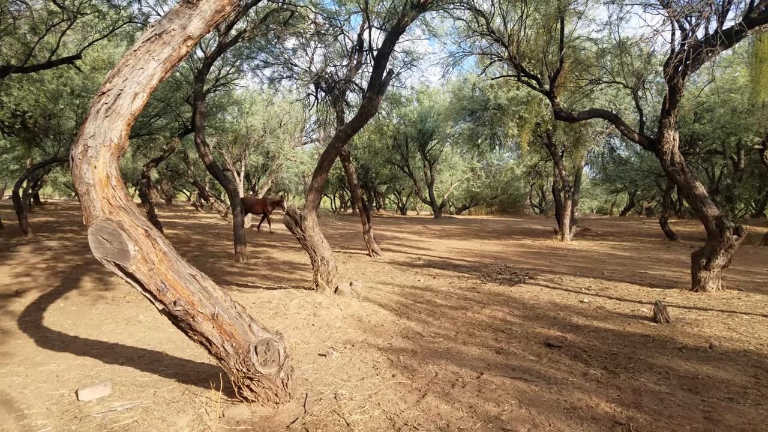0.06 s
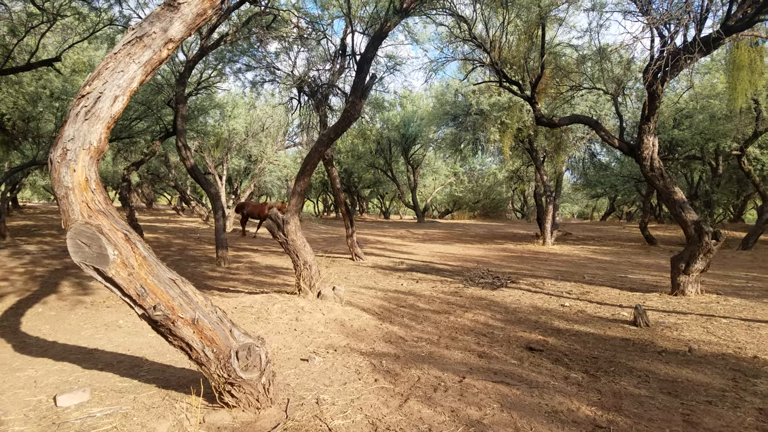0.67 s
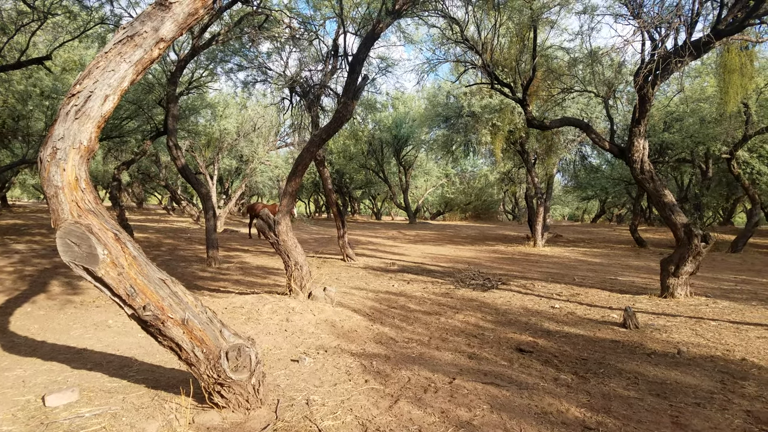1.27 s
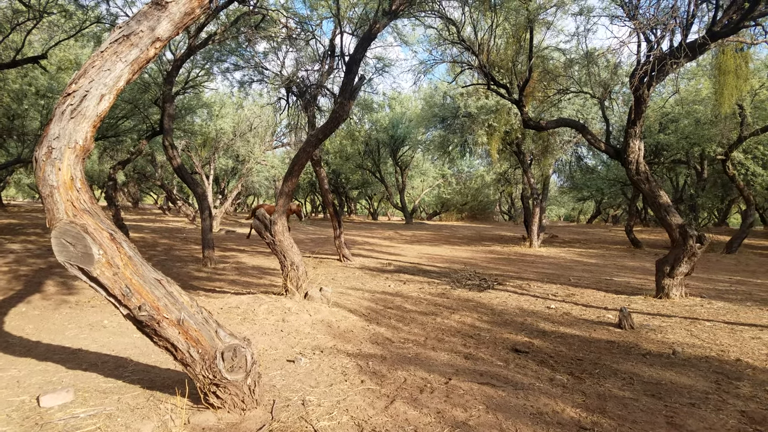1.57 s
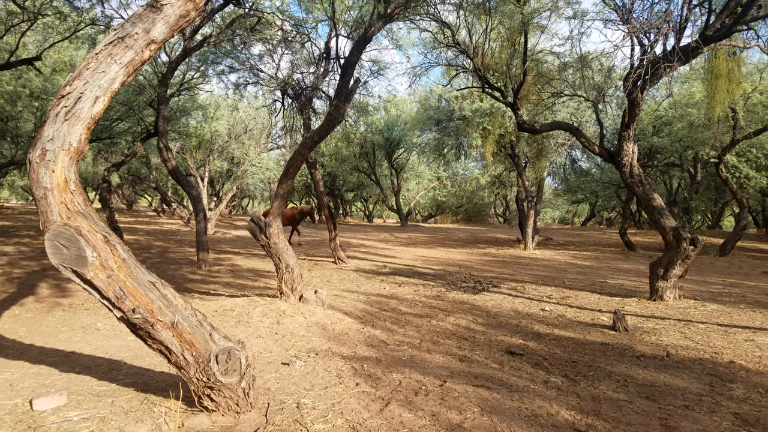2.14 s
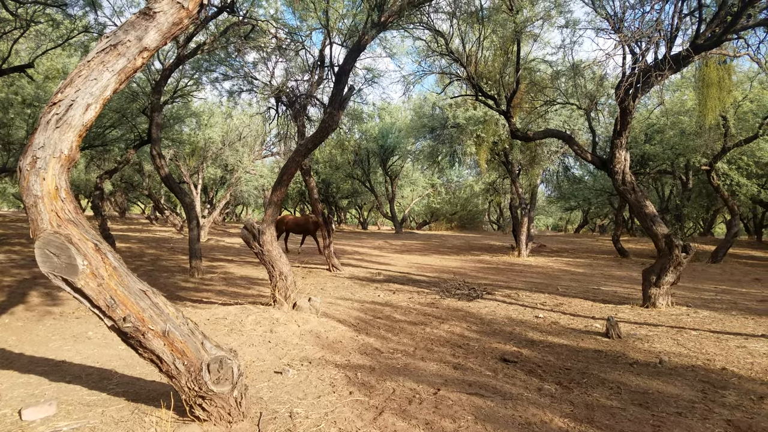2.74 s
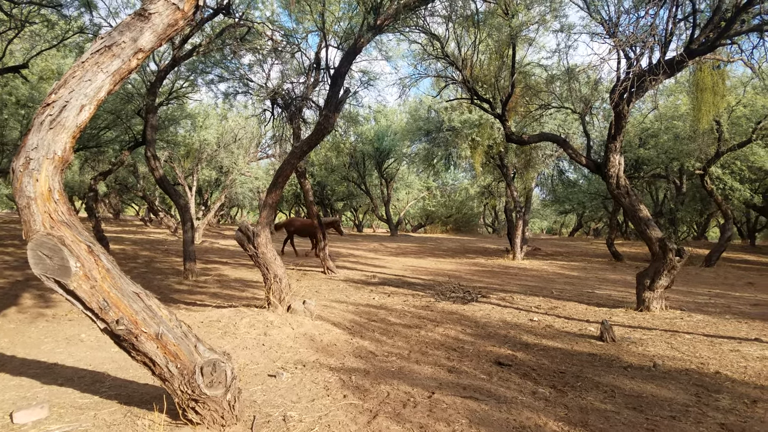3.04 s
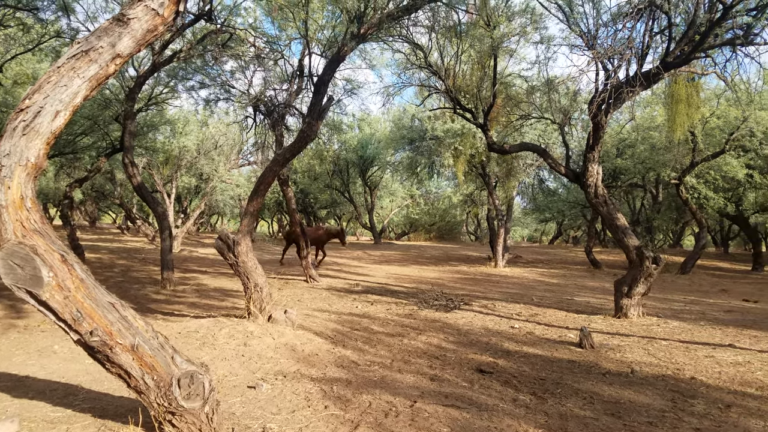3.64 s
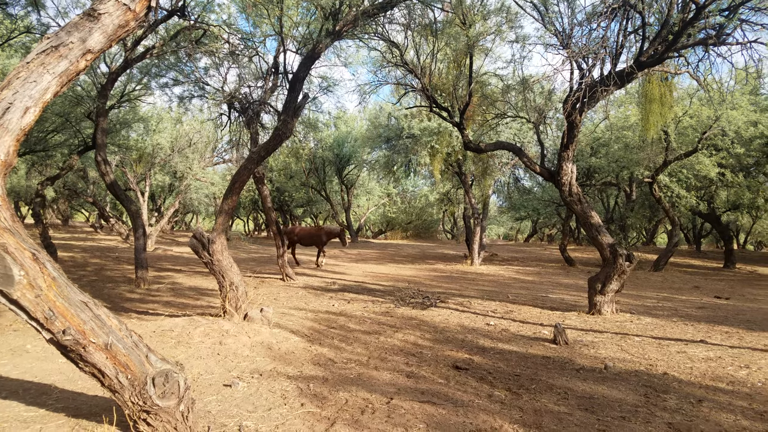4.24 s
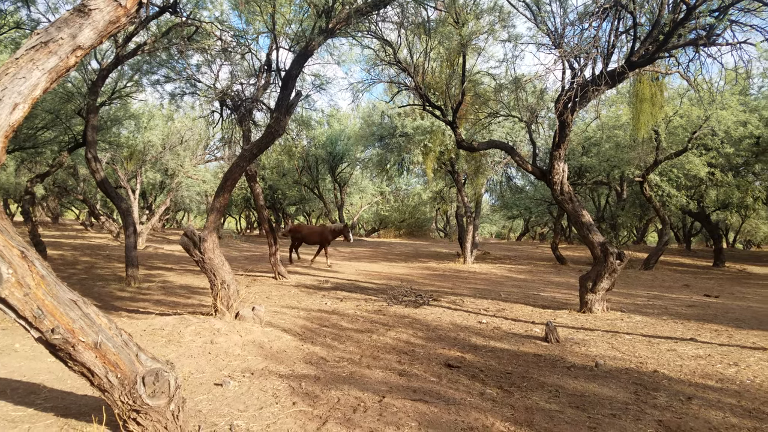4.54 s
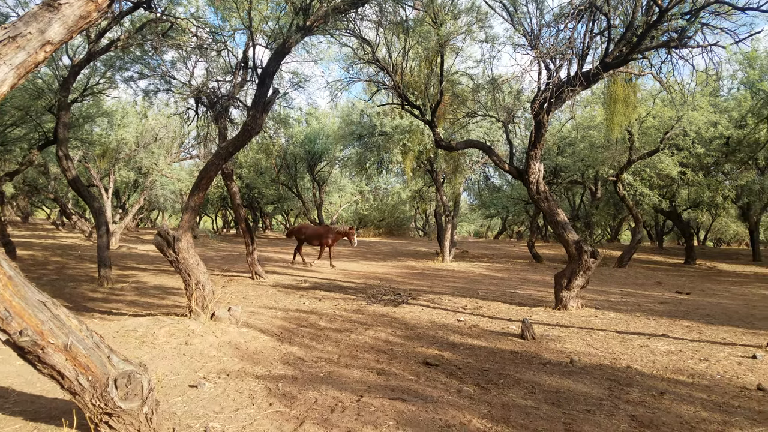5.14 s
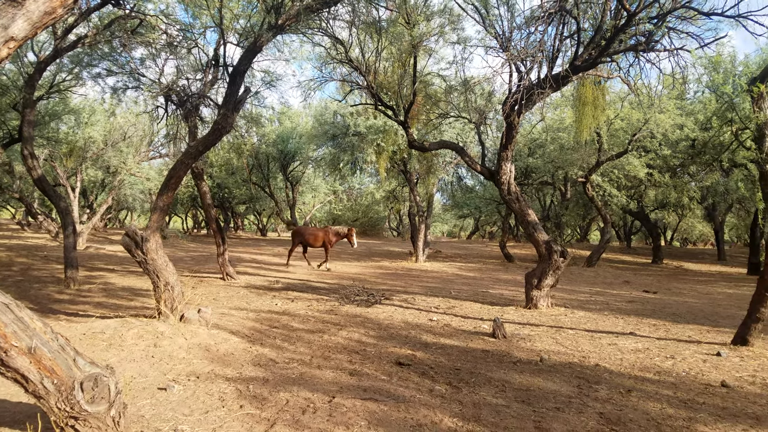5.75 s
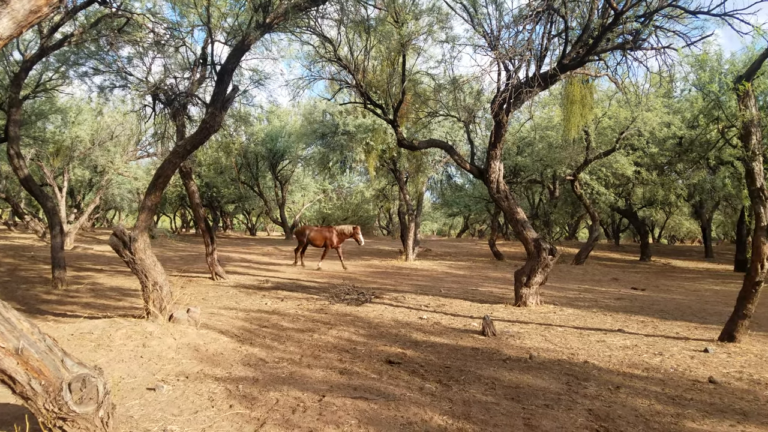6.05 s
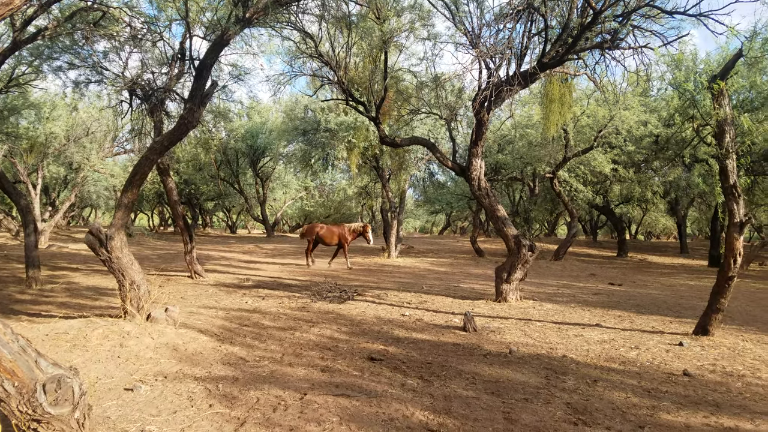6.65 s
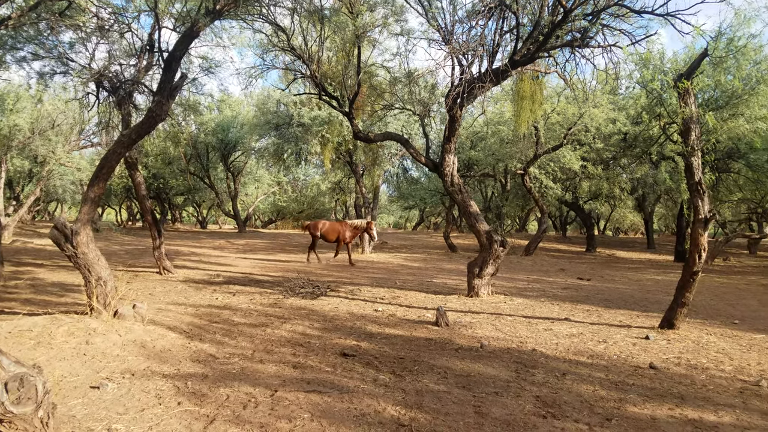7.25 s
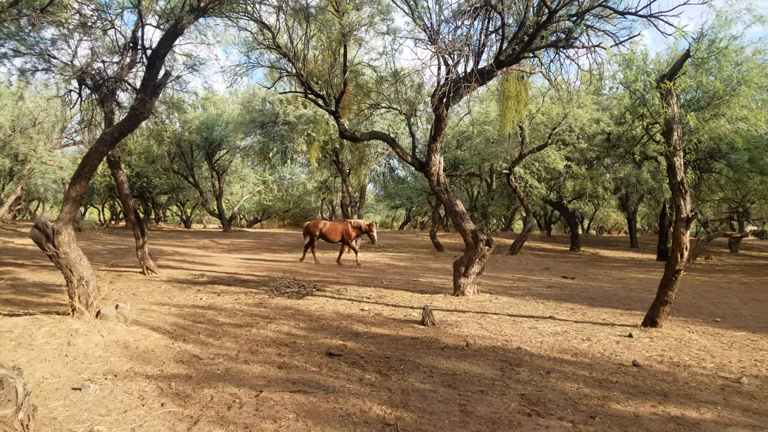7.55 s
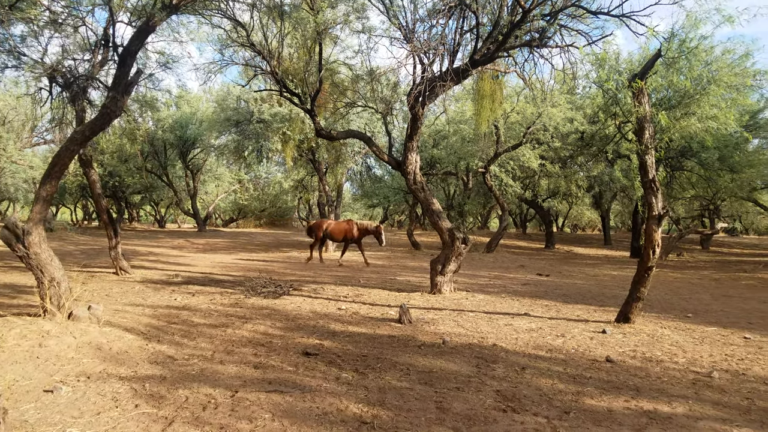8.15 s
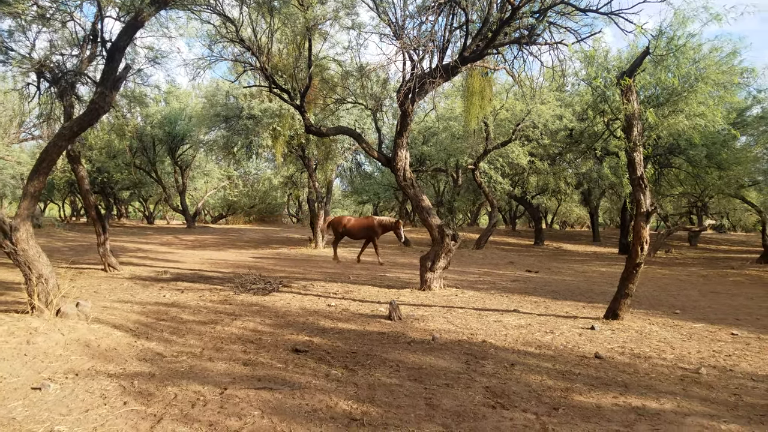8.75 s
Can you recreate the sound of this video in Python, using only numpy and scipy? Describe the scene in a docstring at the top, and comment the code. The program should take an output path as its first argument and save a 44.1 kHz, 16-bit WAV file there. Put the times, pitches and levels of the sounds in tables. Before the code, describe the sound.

A far-off engine throbs on the left and slowly grows louder, with a thin whine and the hiss of tyres on gravel. Faint dry ticks, brief bird calls and a soft breeze fill the quiet space among trees. Two close, sharp clicks halfway through are the loudest sounds. Three light metallic clinks follow, then a dry rustle and a few low bumps of wind on the microphone.

```python
"""A motor vehicle drones far off to the left of a quiet grove, gathers speed, changes gear and draws nearer.
Its exhaust throbs under a thin whine, its tyres roar and crunch on gravel, and a breeze stirs the leaves.
There are dry ticks, gritty scrapes and thin bird-like chips, and small birds call. Something catches and
lets go at the microphone with two sharp clicks, then loose metal clinks three times. Gritty rustles come
and go, loudest near the end, where a high fizz tops them and air buffets the microphone."""
import sys
import numpy as np
from scipy import signal
from scipy.fft import rfft, irfft, next_fast_len
from scipy.io import wavfile
from scipy.ndimage import uniform_filter1d, map_coordinates

SR = 44100
rng = np.random.default_rng(int(sys.argv[2]) if len(sys.argv) > 2 else 0)


def waveform_to_disk(signal):
    """Save audio, clipped to [-1, 1], as 16-bit WAV at the path in sys.argv[1]."""
    frames = np.transpose(np.atleast_2d(signal))
    scaled = np.clip(frames, -1, 1) * 32767
    samples = np.round(scaled).astype(np.int16)
    wavfile.write(sys.argv[1], SR, samples)


N = 392931
T = np.arange(N) / SR

# the engine's firing rate: t/s, f/Hz
FIRING_RATE = [(0,165),(.75,179),(1.02,168),(2.08,179.4),(2.9,199.5),(4.1,228),(4.45,233.5),(4.69,231),(4.99,192),(6,202.5),(6.83,209.8),(7.54,214),(8.91,220)]
# the vehicle grows louder as it nears: t/s, gain/dB
APPROACH_GAIN = [(0, -9.5), (1, -11), (2.2, -12.5), (2.9, -7), (4.1, -4), (4.8, -1.5), (6.4, -0.5),
                 (8.45, -0.3), (8.91, -0.5)]
# its bearing: t/s, lead of the left ear/ms
LEFT_LEAD = [(0, 0.45), (6, .43), (7.7, 0.35), (8.9, 0.3)]


def gain_of(db):
    """Decibels to amplitude."""
    return 10 ** (np.asarray(db) / 20)


def unit_rms(x):
    """Scales to rms 1."""
    return x / np.sqrt(np.mean(x ** 2) + 1e-20)


def curve(rows, column=1):
    """One column of a table, joined by straight lines in time."""
    rows = np.array(rows)
    return np.interp(T, rows[:, 0], rows[:, column])


def spectrum_at(points, hz):
    """A spectrum joined by straight lines on a log-frequency axis."""
    f, value = np.transpose(points)
    return np.interp(np.log(hz + 1), np.log(f + 1), value)


def add(mix, start, sound):
    """Mixes a sound in at a start time in seconds."""
    part = mix[:, round(start * SR):][:, :sound.shape[-1]]
    part += sound[..., :part.shape[-1]]


def noise(spectrum):
    """Coloured noise of rms 1, rolling off above the spectrum's last point."""
    count = next_fast_len(N)
    hz = np.fft.rfftfreq(count, 1 / SR)
    shape = gain_of(spectrum_at(spectrum, hz)) / (1 + (hz / (2 * spectrum[-1][0])) ** 2)
    return unit_rms(irfft(rfft(rng.standard_normal(count)) * shape, count)[:N])


def drift(rate_hz):
    """Smooth random wandering of rms 1."""
    knots, coarse = rng.standard_normal(4000), T[::16]
    wander = map_coordinates(knots, [coarse * rate_hz], order=3, mode="wrap")
    return unit_rms(np.interp(T, coarse, wander))


def ears(x, lead_ms):
    """Places a sound by delaying the right ear."""
    delayed = np.arange(len(x)) - lead_ms * SR / 1000
    return np.array([x, map_coordinates(x, [delayed], order=3, mode="nearest")])


def from_road(spectrum, scatter, right_db):
    """Noise from the vehicle's bearing; the trees scatter a share of its power into a diffuse wash."""
    diffuse = np.array([noise(spectrum), noise(spectrum)])
    direct = ears(noise(spectrum), curve(LEFT_LEAD))
    balance = gain_of([[-right_db / 2], [right_db / 2]])
    return (np.sqrt(1 - scatter) * direct + np.sqrt(scatter) * diffuse) * balance


def impulse_response(db):
    """A minimum-phase filter of this colour, with energy 1."""
    log_gain = np.log(gain_of(np.r_[db, db[-2:0:-1]]))
    response = np.fft.ifft(np.exp(np.conj(signal.hilbert(log_gain)))).real
    return response / np.linalg.norm(response)


def burst(rise, t60, size=4096):
    """A swarm of tiny slips that swells and dies away; rise and t60 in seconds."""
    t = np.arange(size) / SR
    envelope = np.minimum(t / rise, 1) * gain_of(-60 * np.maximum(t - rise, 0) / t60)
    return rng.choice([-1., 1.], size) * envelope


def flat_burst(rise, t60):
    """A burst with no colour of its own, so that the struck body alone sets the timbre."""
    slips = burst(rise, t60)
    envelope = abs(slips)
    for _ in range(12):  # whiten, then restore the envelope
        flat = irfft(np.exp(1j * np.angle(rfft(slips))))
        slips = flat * envelope / np.sqrt(abs(uniform_filter1d(flat ** 2, size=24)) + 1e-20)
    return slips


def engine():
    """Three exhaust orders and a fuzzy whine, fluttering on their way through moving air."""
    # how hard the engine pulls: t/s, load/0..1
    pull = [(2.3, 0.02), (2.9, 0.99), (4.2, 0.65), (4.8, 0), (5.8, 0.8), (6.95, 1), (7.4, 0.63),
            (8.91, 0.3)]
    # the firing tone fades in and out through the trees: t/s, level/dB
    firing_level = [(0, -70), (.65, -56), (1.05, -66.5), (2.1, -59.5), (2.9, -50), (3.33, -59.5),
                    (3.9, -48), (4.9, -59), (5.2, -52), (6, -48.5), (6.75, -44), (7.13, -53.5), (7.53, -42),
                    (7.87, -54), (8.08, -45), (8.36, -55), (8.6, -50.5), (8.91, -51)]
    # the whine spools up and down behind the engine: t/s, f/Hz
    whine_pitch = [(0, 8300), (.9, 8900), (2.4, 9100), (3.5, 11100), (4.6, 12400), (5.3, 11300),
                   (5.8, 11300), (7.5, 12150), (8.91, 12350)]
    load = curve(pull)
    top_gear = np.interp(T, (4.3, 5.26), (0, 1))
    firings = np.cumsum(curve(FIRING_RATE) * (1 + .0038 * drift(rate_hz=14))) / SR
    orders = [(1, curve(firing_level) - .5, .16),
              (.5, -71 + 12.5 * top_gear + 3 * load, .25),  # uneven firing, stronger in the higher gear
              (1.5, -73.5 + 17.5 * load, .2)]
    drone = np.zeros(N)
    for multiple, level_db, flutter_rad in orders:
        phase = 2 * np.pi * (multiple * firings + rng.random()) + flutter_rad * drift(rate_hz=28)
        drone += gain_of(level_db + 1.26 * drift(rate_hz=30)) * np.sin(phase)
    lower_hz = curve(whine_pitch)
    upper_hz = 1.28 * lower_hz
    lower = np.sin(2 * np.pi * np.cumsum(lower_hz * (1 + .0075 * drift(rate_hz=400))) / SR)
    upper = np.sin(2 * np.pi * np.cumsum(upper_hz * (1 + .015 * drift(rate_hz=440))) / SR)
    resonance_hz, width_hz = 15200, 1200
    upper /= 1 + (2 * (upper_hz - resonance_hz) / width_hz) ** 2
    whine = gain_of(-87.5) * lower + gain_of(-78) * upper
    whine *= gain_of(8 * load + .15 * curve(APPROACH_GAIN) + 2.5 * drift(rate_hz=20))
    return np.sqrt(2) * ears(drone + whine, curve(LEFT_LEAD)) * gain_of([[-.7], [.1]])


def rumble_and_roar():
    """Exhaust rumble and tyre roar grow with the approach; a deep swell joins them near the end."""
    # spectra of the three layers: f/Hz, level/dB
    rumble_colour = [(30, -44), (60, -8.5), (100, -7.5), (150, -2), (240, 0), (320, -3.5), (430, -5.5),
                     (560, -22.5), (900, -39)]
    roar_colour = [(300, -7.5), (480, -1.5), (600, 0), (850, 2.5), (1200, -1.5), (1600, -2), (2000, -12),
                   (3500, -41)]
    swell_colour = [(15, -22), (35, -16), (60, -5), (100, 7), (160, -20), (300, -3)]
    # the swell's rise: t/s, level/dB
    swell_level = [(8.1, -85), (8.32, -67), (8.39, -52), (8.6, -53.5), (8.91, -49.5)]
    approach_db = curve(APPROACH_GAIN)
    rumble = from_road(rumble_colour, scatter=.028, right_db=0)
    rumble *= gain_of(-50.5 + approach_db + .32 * drift(rate_hz=11))
    roar = from_road(roar_colour, scatter=.39, right_db=1)
    roar *= gain_of(-56 + .74 * approach_db + .53 * drift(rate_hz=15))
    swell = from_road(swell_colour, scatter=.023, right_db=-1) * gain_of(curve(swell_level))
    return rumble + roar + swell


def gravel():
    """Tyres on gravel: a hiss that grows with engine speed and brightens as it nears, and popping grit."""
    # spectra of far hiss, near hiss and grit: f/Hz, level/dB
    far_colour = [(1100, -53), (1750, 1.5), (2300, 5.5), (2950, 0.5), (3500, -5), (4500, -15.5),
                  (5500, -21), (6700, -16), (7800, -44), (8700, -11), (10500, -49), (16000, -20)]
    near_colour = [(1100, -43), (1750, -13), (2300, -2), (3000, 2), (3600, -6), (4600, 1), (5500, -4),
                   (6500, -5.5), (9000, -10), (12000, -22), (16000, -25)]
    grit_colour = [(1200, -8.5), (2000, 1.5), (3000, -0.5), (3700, -5), (7000, -41)]
    # crossfade from far to near: t/s, near share/0..1
    nearness = [(5.3, .05), (7, 0.59), (8.91, 0.6)]
    # crunches under the tyres: t/s, level/dB
    grit_level = [(0, -63), (.5, -69), (.95, -59.5), (1.75, -61.5), (2.1, -67), (4.1, -58.5), (4.75, -56.5),
                  (5.5, -66.5), (7.5, -63.5), (8.3, -78)]
    near = curve(nearness)
    far_hiss = np.sqrt(1 - near) * from_road(far_colour, scatter=.79, right_db=4.5)
    near_hiss = np.sqrt(near) * from_road(near_colour, scatter=.26, right_db=-.5) * gain_of(-2.5)
    cruise_hz, db_per_hz = 200, .09
    hiss_db = -59 + .2 * curve(APPROACH_GAIN) + db_per_hz * (curve(FIRING_RATE) - cruise_hz)
    hiss = (far_hiss + near_hiss) * gain_of(hiss_db + 1.25 * drift(rate_hz=90))
    clumps = unit_rms(gain_of(3.2 * drift(rate_hz=250) + drift(rate_hz=20)))
    grit = from_road(grit_colour, scatter=.17, right_db=3.5) * clumps * gain_of(curve(grit_level))
    return hiss + grit


def breeze():
    """Lumpy low wind and fine leaf hiss, independent in each ear."""
    # spectra of wind and leaves: f/Hz, level/dB
    wind_colour = [(30, -11), (55, 1), (85, 1), (140, -3.5), (250, -3.5), (400, -3.5), (600, -17.5),
                   (1200, -14.5), (3000, -55)]
    leaf_colour = [(1500, 3.5), (3000, -1), (5000, 5.5), (7000, -2), (10000, 0.5), (13000, 0), (16000, 3.5)]
    # the breeze's strength: t/s, wind level/dB, leaf level/dB
    levels = [(0, -58.5, -69.5), (2, -55.5, -68), (4.5, -56, -61.5), (6.5, -67, -62.5), (8.91, -81, -61)]
    wind = np.array([noise(wind_colour) * gain_of(ear_db + .26 * drift(rate_hz=8.1))
                     for ear_db in (-4, 2)])
    leaves = np.array([noise(leaf_colour), noise(leaf_colour)]) * gain_of(.5 * drift(rate_hz=28))
    return wind * gain_of(curve(levels)) + leaves * gain_of(curve(levels, column=2))


def sizzle():
    """Two narrow bands of noise from the vehicle's side, coming in small surges."""
    # envelopes of the two bands: t/s, level/dB
    low_level = [(.7, -74), (.9, -68.5), (2.1, -69.5), (2.6, -70), (5.8, -88), (6.7, -68)]
    high_level = [(2.3, -83), (3.6, -70), (7.8, -69), (8.28, -63), (8.7, -76)]
    out = np.zeros(N)
    for centre_hz, width_hz, level in [(4420, 940, low_level), (5440, 560, high_level)]:
        b, a = signal.iirpeak(centre_hz, centre_hz / width_hz, fs=SR)
        band = unit_rms(signal.lfilter(b, a, signal.lfilter(b, a, rng.standard_normal(N))))
        out += band * gain_of(curve(level) + 1.2 * drift(rate_hz=13))
    return ears(out, curve(LEFT_LEAD))


def ticks_and_chips():
    """Short dry ticks from the vehicle's side and very high, thin bird-like chips near the centre."""
    # ticks (low) and chips (high): t/s, relative level/dB, centre f/Hz
    events = [(0.026, -54.5, 2510), (0.81, -64, 10800), (1.127, -48.5, 2180), (1.369, -68, 10900),
              (1.838, -53, 2100), (2.895, -53.5, 2300), (3.02, -49, 1860), (5.055, -55.5, 11100),
              (5.221, -56.5, 11200), (5.361, -56, 10800), (5.386, -51, 10700), (8.024, -55, 1900),
              (8.187, -51, 2000), (8.643, -51, 10900), (8.83, -58, 10900)]
    out, hz = np.zeros((2, N)), np.fft.rfftfreq(512, 1 / SR)
    for start, db, centre_hz in events:
        band_db = -20 * np.log10(1 + abs((hz - centre_hz) / 750) ** 3)
        blip = signal.fftconvolve(burst(rise=.00039, t60=.011), impulse_response(band_db))
        add(out, start, gain_of(db + 7.5) * ears(blip, lead_ms=.44 if centre_hz < 5000 else .02))
    return out


def scrapes_and_fizz():
    """Short gritty scrapes and a high fizz over the late rustle: showers of grains in broad bands."""
    # grain showers: t/s, length/s, level/dB, centre f/Hz
    showers = [(0.609, 0.045, -61.5, 2350), (0.969, 0.041, -61, 2220), (1.749, 0.093, -61.5, 2380),
               (3.388, 0.096, -55, 660), (8.024, .28, -67, 14000), (8.411, 0.056, -55.5, 3020),
               (8.497, 0.065, -60, 4200)]
    grains_per_s = 1800
    out, hz = np.zeros((2, N)), np.fft.rfftfreq(1024, 1 / SR)
    for start, length, db, centre_hz in showers:
        count = round(length * SR)
        grains = rng.standard_normal(count) * (rng.random(count) < grains_per_s / SR)
        grains *= signal.windows.tukey(count, .5)
        band_db = -20 * np.log10(1 + ((hz - centre_hz) / (.42 * centre_hz)) ** 2)
        shower = unit_rms(signal.fftconvolve(grains, impulse_response(band_db)[:256]))
        add(out, start, gain_of(db) * ears(shower, lead_ms=.32))
    return out


def rustles():
    """Dry rustles of clumped grains and separate crackles: each swells, holds and fades."""
    # rustle envelopes: t/s, attack/s, hold/s, release/s, level/dB
    swells = [(.93, 0.053, 0.09, .12, -75), (1.7, 0.05, 0.041, 0.11, -65), (4.677, 0.1, 0.058, 0.17, -62),
              (6.566, .006, 0.013, 0.029, -54.5), (7.802, 0.2, 0.34, 0.15, -53),
              (8.362, 0.052, 0.18, 0.23, -52)]
    # spectrum of grains and crackles: f/Hz, level/dB
    colour = [(300, -8), (520, 2), (850, -6.5), (1300, -9), (1750, -3.5), (2300, -17), (2900, -6),
              (3500, -15), (4300, -11.5), (4850, -16), (5450, -9), (6000, -20), (6900, -13.5),
              (8400, -20.5), (9800, -16), (11800, -26), (13800, -20), (16000, -27)]
    envelope = sum(gain_of(db) * np.interp(T, np.cumsum(stages), (0, 1, 1, 0)) for *stages, db in swells)
    clumps = unit_rms(gain_of(1.8 * drift(rate_hz=320) + 1.9 * drift(rate_hz=25)))
    snaps_per_s = 56
    snaps = rng.standard_normal(N) * (rng.random(N) < snaps_per_s / SR)
    snap_filter = impulse_response(spectrum_at(colour, np.fft.rfftfreq(512, 1 / SR)))
    crackle = unit_rms(signal.oaconvolve(snaps, snap_filter)[:N])
    grains = from_road(colour, scatter=.62, right_db=.5) * clumps
    return (grains + .33 * ears(crackle, lead_ms=.28)) * envelope


def birds():
    """Short arched whistles with a weak octave; the highest are rougher and brighter."""
    # bird notes: t/s, length/s, top f/Hz, level/dB, arch/octaves, right minus left/dB
    notes = [(2.261, 0.13, 451, -57, 0.18, 0), (3.356, 0.043, 6600, -65.5, .17, 7),
             (3.897, .032, 6600, -62.5, 0.16, 0), (5.466, .04, 6430, -60, 0.25, 9),
             (5.87, 0.11, 3020, -64, 0.046, 7), (6.052, .047, 6500, -55.5, 0.21, 11),
             (6.449, 0.079, 2990, -61.5, 0.033, 14), (7.756, 0.088, 2980, -57, 0.039, 7)]
    out = np.zeros((2, N))
    for start, length, top_hz, db, arch, right_db in notes:
        progress = np.linspace(0, 1, round(length * SR))
        roughness, octave_db = (.03, -9) if top_hz > 6000 else (.014, -25)
        waver = 1 + roughness * drift(rate_hz=920)[:len(progress)]
        pitch_hz = top_hz * waver * 2 ** (-arch * ((progress - .4) / .5) ** 2)
        phase = 2 * np.pi * np.cumsum(pitch_hz) / SR
        note = (np.sin(phase) + gain_of(octave_db) * np.sin(2 * phase)) * np.sin(np.pi * progress)
        ear_gains = gain_of([[db - right_db / 2], [db + right_db / 2]])
        add(out, start, np.sqrt(2) * ears(note, lead_ms=.013) * ear_gains)
    return out


def casing_ports(x):
    """A sound in the microphone's casing reaches each port with its own phase and strength."""
    # balance of the ports: f/Hz, left minus right/dB
    balance = [(2400, -2.5), (4600, 0), (6300, 8), (7400, 0), (11000, 1), (14000, -4)]
    # phase between them: f/Hz, left lead/rad
    lead = [(100, 1), (2900, -0.6), (5700, -2.5), (7200, -6), (8800, -5), (15000, -9.5)]
    hz = np.fft.rfftfreq(len(x), 1 / SR)
    left = gain_of(spectrum_at(balance, hz) / 2) * np.exp(.5j * spectrum_at(lead, hz))
    return irfft(rfft(x) * np.array([left, 1 / left]), len(x))[:, :-64]


def clicks():
    """Something catches and lets go close to the microphone, whose casing rings briefly."""
    # impacts within the two clicks: t/s, level/dB, rise/s, t60/s, tilt/dB per octave, 0 catch or 1 release
    impacts = [(4.029, -38, .0003, .014, 4, 1), (4.0316, -11.4, .0022, .0085, 0, 0),
               (4.038, -45, .001, .07, 2, 0), (4.2763, -27, .0002, .009, 11, 1),
               (4.2791, -15.7, .00023, .052, 0, 1), (4.2807, -19, .00024, .005, 3, 1),
               (4.3096, -28, .0003, .0055, 32, 1)]
    # casing modes: f/Hz, width/Hz, lift/dB
    modes = [(1850, 110, 6.1), (2310, 430, 10.7), (2720, 130, 7.9), (3480, 260, 11.1), (3850, 150, 3.5),
             (4270, 110, 1.8), (5440, 170, 5.3), (6210, 360, 9.9), (7350, 420, 13.4), (8670, 450, 16.0),
             (9490, 340, 11.3), (10340, 440, 6.7), (11160, 190, 7.7), (15160, 190, 8.3)]
    # spectra of the catch, the release and the knock under the release: f/Hz, level/dB
    catch_colour = [(150, -10), (400, 2.5), (1250, -6), (2300, 6.7), (3000, 5), (4700, 12.5), (6500, 4.5),
                    (9000, -5.5), (11000, -7), (12500, 3.1), (14000, 5.9), (15700, -6)]
    release_colour = [(150, -22), (400, -1), (1500, -2.5), (2300, -1.5), (4400, 14), (4800, -1), (6500, -2),
                      (8000, -12), (9000, -7.2), (11000, 7), (12300, 4), (15500, 7)]
    knock_colour = [(150, -42), (350, -6), (600, 2), (900, -2.5), (1300, -10), (2500, -23)]
    out, hz = np.zeros((2, N)), np.fft.rfftfreq(2048, 1 / SR)
    casing_db = sum(db / (1 + (2 * (hz - f) / width) ** 2) for f, width, db in modes)
    for start, db, rise, t60, tilt_db, is_release in impacts:
        colour_db = spectrum_at(release_colour if is_release else catch_colour, hz)
        colour_db += tilt_db * np.log2(np.clip(hz, 1000, 11000))
        click = signal.fftconvolve(flat_burst(rise, t60), impulse_response(colour_db + casing_db))
        add(out, start, gain_of(db) * casing_ports(click))
    knock_filter = impulse_response(spectrum_at(knock_colour, hz))
    knock = signal.fftconvolve(flat_burst(rise=.0057, t60=.035), knock_filter)
    add(out, 4.279, gain_of(-33) * casing_ports(knock))
    # the released part keeps buzzing for a moment
    buzz_filter = impulse_response(-20 * np.log10(1 + abs((hz - 3900) / 450) ** 4))
    buzz = signal.fftconvolve(burst(rise=.005, t60=.035), buzz_filter)
    add(out, 4.29, gain_of(-32) * casing_ports(buzz))
    return out


def clinks():
    """Loose metal shakes: a rasping rattle that keeps a few modes ringing."""
    # shakes: t/s, level/dB, rattle t60/s, ring gain
    shakes = [(6.837, -54, 0.25, 0.38), (7.126, -48, 0.54, 0.73), (7.44, -52.5, .24, 1)]
    # modes of the metal: f/Hz, level/dB, t60/s
    modes = [(4575, 3, .4), (4635, 2.5, .3), (7370, 0, .17), (7760, -5, .12)]
    # the scrape of each shake: f/Hz, level/dB
    rasp_colour = [(1200, -13), (2700, 5), (3700, 2), (4600, 5), (6300, -4), (7600, 1.5), (9000, -4.5),
                   (15000, -12)]
    out, t = np.zeros((2, N)), np.arange(SR // 2) / SR
    metal = sum(gain_of(db - 60 * t / t60) * np.sin(2 * np.pi * hz * t) for hz, db, t60 in modes)
    metal /= np.linalg.norm(metal)
    rasp_filter = impulse_response(spectrum_at(rasp_colour, np.fft.rfftfreq(512, 1 / SR)))
    for start, db, rattle_t60, ring_gain in shakes:
        ring = signal.fftconvolve(burst(rise=.0071, t60=rattle_t60, size=len(t)), metal)[:len(t)]
        rasp = signal.fftconvolve(burst(rise=.0035, t60=.28, size=len(t)), rasp_filter)[:len(t)]
        add(out, start, gain_of(db) * ears(ring_gain * ring + 1.38 * rasp, lead_ms=.391))
    return out


def buffets():
    """Air pushes on the microphone in soft low thumps, a few cycles each."""
    # thumps: t/s, length/s, level/dB, f/Hz
    thumps = [(8.345, 0.034, -42, 210), (8.367, 0.19, -55, 45.7), (8.472, 0.12, -51, 109.6)]
    out = np.zeros((2, N))
    for start, length, db, hz in thumps:
        t = np.arange(0, length, 1 / SR)
        push = np.sin(2 * np.pi * (hz * t + rng.random())) * np.sin(np.pi * t / length)
        add(out, start, np.sqrt(2) * gain_of(db) * push)
    return out


def scene():
    """The vehicle and the breeze form the bed; small, close sounds sit on top."""
    bed = engine() + rumble_and_roar() + gravel() + breeze() + sizzle()
    texture = ticks_and_chips() + scrapes_and_fizz() + rustles()
    return bed + texture + birds() + clicks() + clinks() + buffets()


def record(dry):
    """The recorder's band limit: a steep low-pass on the top treble."""
    cutoff_hz = 15850
    lowpass = signal.firwin(511, cutoff_hz, window=("kaiser", 9), fs=SR)
    return signal.oaconvolve(dry, lowpass[None], "same", axes=1)


dry = scene()
out = record(dry)
waveform_to_disk(out)
```